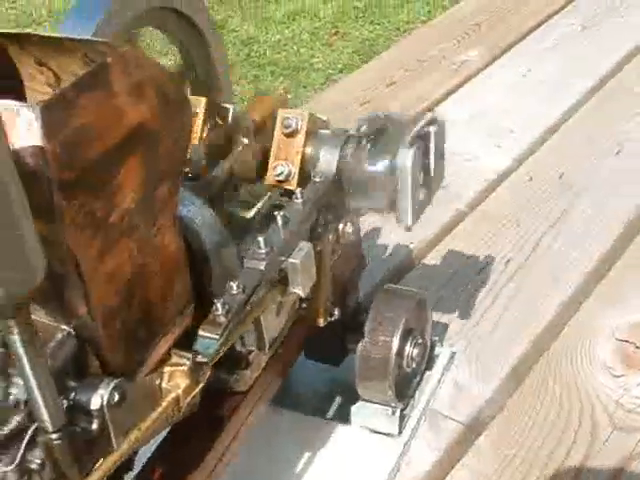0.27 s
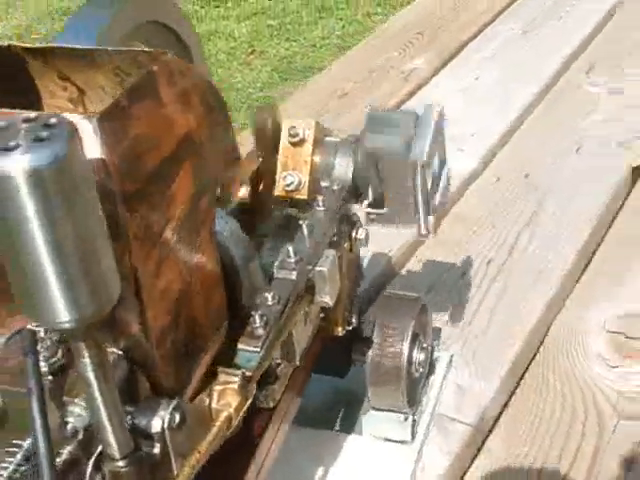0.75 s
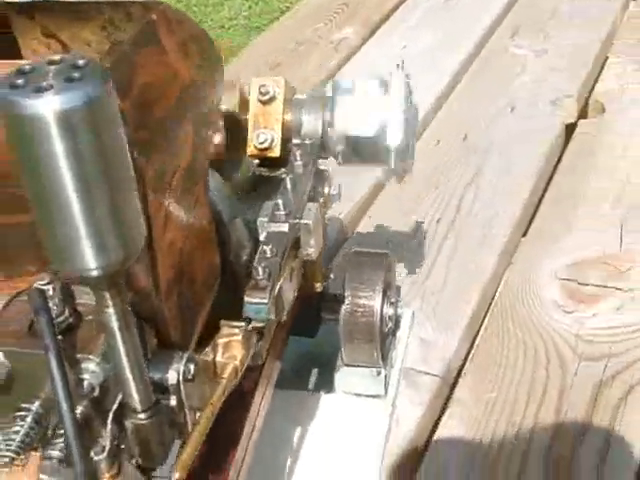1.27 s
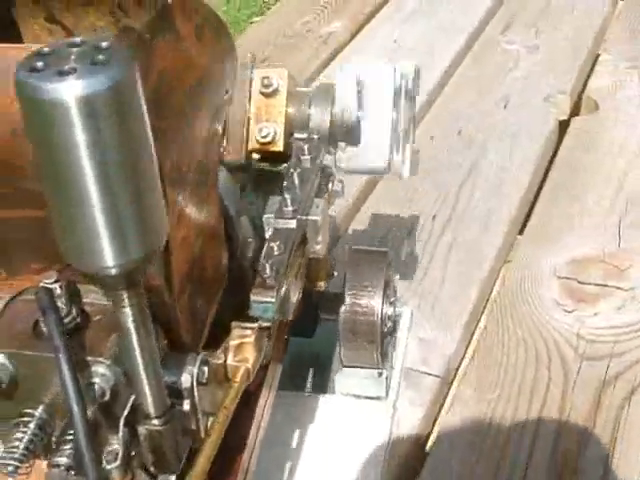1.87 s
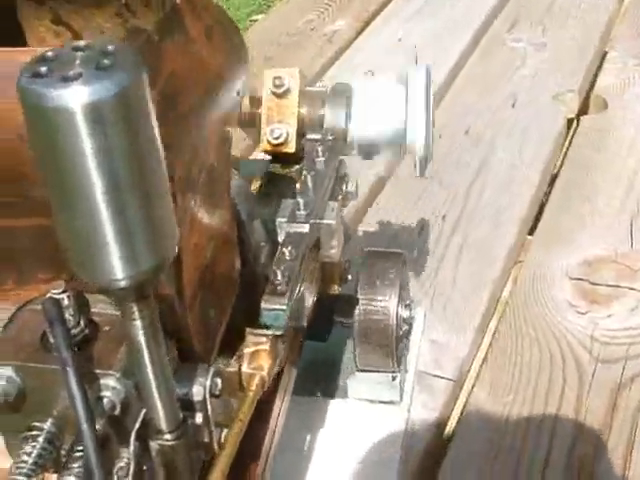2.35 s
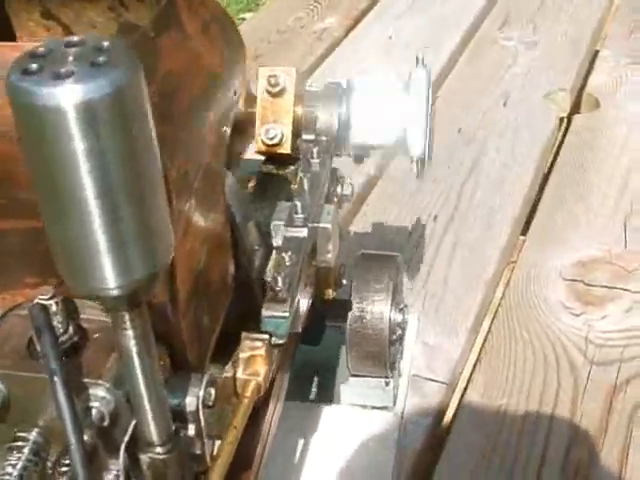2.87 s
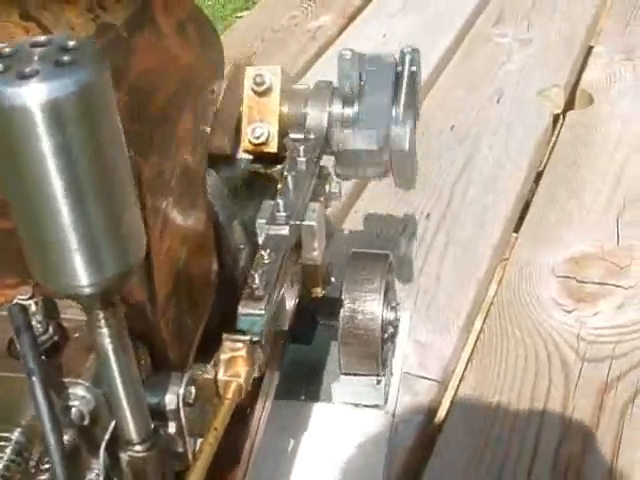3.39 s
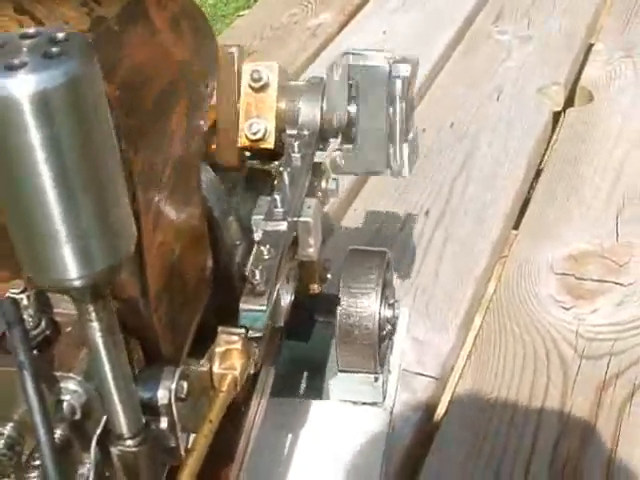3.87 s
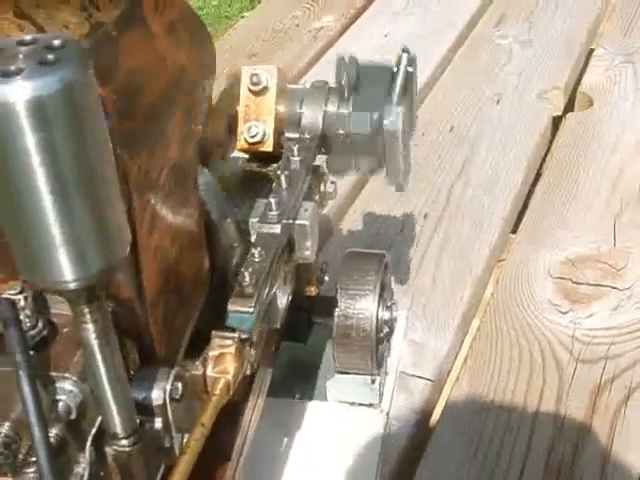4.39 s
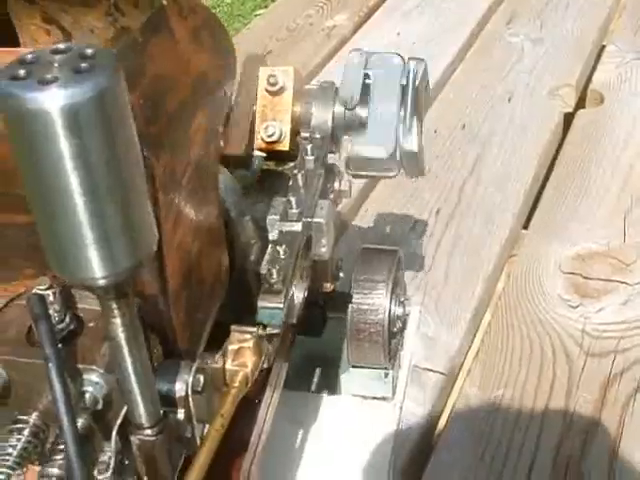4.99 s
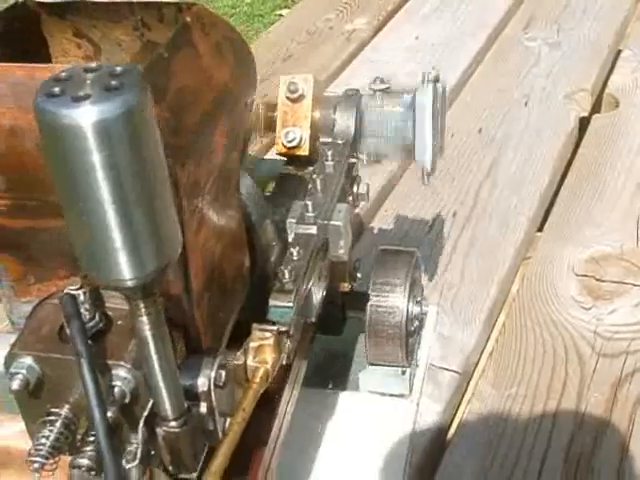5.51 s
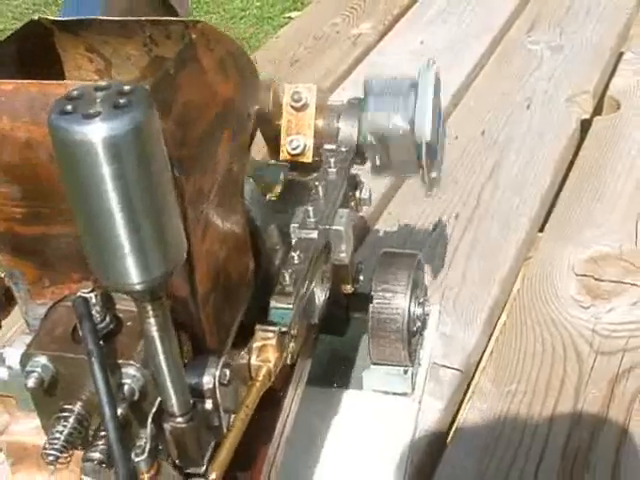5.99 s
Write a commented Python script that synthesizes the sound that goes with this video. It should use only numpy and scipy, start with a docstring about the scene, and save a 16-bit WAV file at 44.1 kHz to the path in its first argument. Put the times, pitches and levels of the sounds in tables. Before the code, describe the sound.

A small open-crank engine runs close to the microphone in a yard. About once a second it fires with a sharp, spitting crack from its metal silencer, seven times in all. Between firings it coasts with quick soft puffs of air, ticking and jingling rods, a faint gear whirr and brief weak hoots from the intake. There is hardly any echo, and the quiet parts have a gritty crackle.

```python
"""Outdoors in a fenced yard, a small open-crank engine coasts, puffing air through its open exhaust valve
at each piston stroke while the gears whirr, the linkage ticks and the intake valve hoots. About once a
second the pushrod drops off the governor latch, the engine fires and the pepper-pot silencer cracks.
It all passes through an 8-bit, 16 kHz converter, so the quiet parts break up into single-step crackle."""
import sys
import numpy as np
from scipy import signal
from scipy.fft import rfft, irfft, next_fast_len
from scipy.io import wavfile
from scipy.ndimage import map_coordinates

SR = 44100
rng = np.random.default_rng(int(sys.argv[2]) if len(sys.argv) > 2 else 0)


def int16_out(signal):
    """Quantize to a 16-bit WAV file."""
    q = np.round(np.clip(np.atleast_2d(signal).T, -1, 1) * 32767)
    wavfile.write(sys.argv[1], SR, q.astype(np.int16))


N = 275625

# firings: t/s, pressure push/dB, spit/dB, blow-down length/s, lead of the latch drop/s, latch drop/dB
FIRINGS = [(0.632, -24, -6, 0.0084, 0.022, -28.5), (1.6273, -22, -6, 0.01, 0.029, -28.5),
           (2.3747, -18, -4.5, 0.0076, 0.029, -33), (3.3334, -21.5, -4.5, 0.009, .028, -29.5),
           (4.3275, -23, -4.5, 0.0091, 0.028, -27.5), (5.3306, -21.5, -4, 0.0069, .0315, -29),
           (6.0825, -21.5, -4.5, 0.0082, 0.026, -31.5)]
# puffs of pumped air, about one per piston stroke: t/s, level/dB, pipe note/Hz
STROKES = [(0.0268, -33, 850), (0.109, -32.5, 1150), (0.1984, -32, 1150), (0.2903, -37.5, 433),
           (0.3406, -41, 1470), (0.4286, -32, 875), (0.5385, -47, 595), (0.7202, -36, 426),
           (0.812, -31.5, 910), (0.8992, -33, 363), (0.989, -31.5, 1260), (1.0803, -33, 371),
           (1.1787, -33.5, 840), (1.2534, -42, 1440), (1.3254, -45.5, 1190), (1.4055, -33, 1010),
           (1.438, -42.5, 450), (1.5367, -43, 1190), (1.713, -33.5, 923), (1.8094, -30, 964),
           (1.892, -28.5, 358), (1.925, -39, 740), (1.9731, -31, 1286), (2.0742, -35, 1190),
           (2.1603, -32.5, 1310), (2.1894, -29.5, 930), (2.3229, -36.5, 1390), (2.4645, -34.5, 627),
           (2.5561, -34, 970), (2.6363, -34.5, 896), (2.7206, -35, 930), (2.812, -33.5, 500),
           (2.9068, -35.5, 1000), (2.9444, -39.5, 1200), (2.98, -36, 440), (3.0882, -42, 1370),
           (3.1212, -33.5, 910), (3.155, -37, 466), (3.2457, -43, 1370), (3.4277, -35, 960),
           (3.511, -32.5, 1075), (3.5999, -31.5, 550), (3.691, -33.5, 910), (3.78, -32.5, 935),
           (3.8676, -31, 1070), (3.9124, -31, 1250), (4.023, -47.5, 1480), (4.102, -32, 893),
           (4.2228, -39.5, 790), (4.4107, -37, 1150), (4.5043, -34, 1230), (4.5936, -33.5, 1030),
           (4.6316, -43, 720), (4.684, -32.5, 1020), (4.7742, -37, 1050), (4.8752, -34, 1200),
           (4.9116, -35, 440), (5.023, -40, 1480), (5.1111, -32, 920), (5.223, -42.5, 1204),
           (5.4303, -35.5, 1040), (5.5061, -32, 1020), (5.5947, -31.5, 353), (5.6948, -31.5, 830),
           (5.781, -30.5, 960), (5.8792, -32, 1110), (5.915, -33.5, 486), (5.9772, -45, 1060),
           (6.028, -39, 1500), (6.169, -36.5, 1184)]
# exhaust pipe resonances: f/Hz, width/Hz, level/dB
PIPE_MODES = [(394, 90, -2.5), (745.3, 130, -5), (995, 90, -2), (1206, 45, 2.5), (1409, 90, -4),
              (1693, 120, -6.5)]
# ringing rods and rockers: f/Hz, level/dB, t60/s
LINKAGE_MODES = [(1478, -4, .05), (2127, -1.5, .05), (2365, -2, .05), (3095, -2.5, 0.074),
                 (3658, -0.5, 0.05), (4790, -7.5, .02), (6640, 0, .03), (7000, -3.5, .02)]
# colour of the stroke hiss and the whirr: f/Hz, level/dB
AIR_SPECTRUM = [(35, -50), (60, -6.5), (251, -4.5), (444, -5), (755, -7), (1210, -6.5), (2730, -12),
                (3640, -11), (6850, -13), (7900, -12), (10300, -54), (17400, -120)]


def amp(db):
    """Gain of a level in dB."""
    return 10 ** (np.asarray(db) / 20)


def unit(x):
    """x at rms 1."""
    return x / np.sqrt(np.mean(x ** 2) + 1e-20)


def along(points, hz):
    """Read a curve of (f/Hz, value) points on a log frequency axis."""
    f, values = np.transpose(points)
    return np.interp(np.log(hz + 1), np.log(f + 1), values)


def filtered(x, response):
    """x through a complex frequency response."""
    size = next_fast_len(len(x) + 8192)
    return irfft(rfft(x, size) * response(np.fft.rfftfreq(size, 1 / SR)), size)[:len(x)]


def noise(response, size=N):
    """Coloured noise of rms 1."""
    return unit(filtered(rng.standard_normal(size), response))


def modes(table):
    """Response of (f/Hz, width/Hz, level/dB) resonances, summed with alternating polarity."""
    return lambda f: sum((-1) ** k * amp(db) * 1j * f * width / (hz * hz - f * f + 1j * f * width)
                         for k, (hz, width, db) in enumerate(table))


def favoured(table, note_hz, db_per_octave):
    """Resonances turned down by their distance from note_hz."""
    return [(hz, width, db - db_per_octave * abs(np.log2(hz / note_hz))) for hz, width, db in table]


def add(track, start, x):
    """Mix x into track from start, in seconds."""
    part = track[max(round(start * SR), 0):][:len(x)]
    part += x[:len(part)]


def whirr():
    """Gears, bearings and open air: a bed of noise that drifts in level."""
    # fader moves: t/s, level/dB
    bed_levels = [(0.0, -51.5), (0.48, -53.5), (1.06, -50.5), (1.43, -56.5), (1.79, -50), (2.091, -46.5),
                  (2.42, -52.5), (2.99, -50), (3.171, -55.5), (3.79, -52.5), (4.1, -55), (4.86, -50.5),
                  (5.17, -54), (5.69, -52.5), (6.0, -54), (6.25, -54)]
    times, db = np.transpose(bed_levels)
    return amp(np.interp(np.arange(N) / SR, times, db)) * noise(lambda hz: amp(along(AIR_SPECTRUM, hz)))


def yard(x):
    """A short answer from the boards, each frequency dying at its own speed."""
    # decay off boards and fence: f/Hz, t60/s
    decay_times = [(200, 0.22), (1200, .25), (4000, 0.11), (8000, 0.033)]
    hz, t, spectra = signal.stft(rng.standard_normal(SR // 3), SR, nperseg=256)
    tail = signal.istft(spectra * amp(-60 * t / along(decay_times, hz)[:, None]), SR, nperseg=256)[1]
    return signal.fftconvolve(np.pad(x, (300, 0)), tail / np.linalg.norm(tail))[:N]


def intake(hoot_hz=441.5):
    """The intake valve hoots as it is sucked open, swelling fast and fading."""
    # hoots: t/s, level/dB, length/s
    hoots = [(0.269, -46, 0.023), (1.217, -41, 0.017), (1.432, -51, 0.066), (2.194, -50.5, 0.042),
             (2.984, -44, 0.029), (3.925, -45.5, 0.025), (4.137, -48, 0.025), (4.92, -46, 0.04),
             (5.141, -47.5, 0.017), (5.928, -41.5, 0.021)]
    out, t = np.zeros(N), np.arange(SR // 6) / SR
    for start, db, length in hoots:
        age = 3 * t / length
        add(out, start, amp(db + 9.5) * age * np.exp(-age) * np.sin(2 * np.pi * hoot_hz * t))
    return out


def snap(db, t60=.012):
    """The thin bright click of a small hard part."""
    return amp(db - 60 * np.arange(400) / SR / t60) * noise(modes([(6670, 2300, 0)]), 400)


def tick(db, struck_hz):
    """A knock rings mostly the part struck, the others weakly, over a short crack."""
    t = np.arange(SR // 10) / SR
    ring = np.zeros(len(t))
    for hz, level, t60 in LINKAGE_MODES:
        mode_db = level - 24 * abs(np.log2(hz / struck_hz)) + rng.normal(0, 1.9)
        ring += amp(mode_db - 60 * t / t60) * np.sin(2 * np.pi * hz * t)
    crack = amp(4 - 60 * t / .0091) * rng.standard_normal(len(t))
    return amp(db - 7.5) * (ring + crack)


def linkage(backlash_s=.05):
    """Rods and rockers tick and snap; each puff also shakes a faint one out of a loose joint."""
    # foreground ticks: t/s, level/dB, pitch of the part struck/Hz
    ticks = [(0.1424, -38, 2150), (0.2314, -26.5, 2190), (0.4294, -32.5, 2100), (0.8994, -46, 1970),
             (1.3239, -31, 1480), (1.7344, -39.5, 3770), (1.8394, -31, 2180), (1.9026, -26, 6000),
             (2.0944, -36, 3640), (2.1101, -30, 2120), (2.1605, -34.5, 2340), (2.2044, -27.5, 2320),
             (2.3226, -29, 1470), (2.5557, -34.5, 3730), (2.7307, -36, 3760), (2.9151, -34.5, 3030),
             (3.1396, -33.5, 2150), (3.5174, -39, 3670), (3.9704, -36, 4010), (4.0238, -29.5, 1460),
             (4.5092, -39, 3800), (4.8194, -37.5, 2010), (4.9117, -40, 2330), (5.022, -33, 1480),
             (5.5967, -29, 6400), (5.6351, -33.5, 2030), (5.6945, -29.5, 1540), (5.7833, -41, 1540),
             (6.0282, -34.5, 1480)]
    # foreground snaps: t/s, level/dB
    snaps = [(1.1636, -36), (1.8344, -39.5), (1.988, -30.5), (2.0113, -34), (2.1604, -31), (2.2094, -38),
             (2.7456, -37), (3.5325, -37.5), (3.7158, -37), (3.8677, -35), (3.9384, -32.5), (4.5294, -36),
             (4.7115, -34.5), (4.8755, -36.5), (5.5163, -43.5), (5.903, -35.5)]
    out = np.zeros(N)
    for start, db, struck_hz in ticks:
        add(out, start, tick(db, struck_hz))
    for start, db in snaps:
        add(out, start, snap(db))
    for (start, db, _), (lag, pick) in zip(STROKES, rng.random((len(STROKES), 2))):
        hz = LINKAGE_MODES[int(pick * len(LINKAGE_MODES))][0]
        loose_db = db - 8.5
        add(out, start + backlash_s * lag, tick(loose_db, hz) if hz < 4000 else snap(loose_db))
    return out


def puff(db, note_hz, rod_hz, t60, rise_s, slack, whistle_trim_db=0):
    """Slack is taken up with a clack, then valve hiss, a pipe note, a thin whistle and jingling rods."""
    t = np.arange(SR // 8) / SR
    envelope = (1 - np.exp(-t / rise_s)) * amp(-60 * t / t60) * np.clip((.11 - t) / .044, 0, 1)
    clack = 1 + slack * np.exp(-t / .003)
    knocks = clack * rng.standard_normal(len(t)) * (rng.random(len(t)) < .008)
    rods = [(hz, 4 / decay, level) for hz, level, decay in LINKAGE_MODES]
    jingle = unit(filtered(knocks, modes(favoured(rods, rod_hz, db_per_octave=6))))
    hiss = noise(lambda hz: amp(along(AIR_SPECTRUM, hz)), len(t))
    airflow = clack * rng.standard_normal(len(t))
    pipe = unit(filtered(airflow, modes(favoured(PIPE_MODES, note_hz, db_per_octave=6.5))))
    whistle = amp(whistle_trim_db) * noise(modes([(6814, 760, 0)]), len(t))
    return amp(db) * envelope * (amp(-14) * (hiss + jingle) + amp(-13.5) * pipe + amp(-22) * whistle)


def coasting(held_open_s=.5, exhaust_rod_hz=3460, rocker_hz=2407):
    """Piston puffs: the exhaust rod jingles while its valve is held open after a firing, then rockers."""
    out = np.zeros(N)
    fired = np.array([-held_open_s / 2] + [row[0] for row in FIRINGS])  # the valve starts held open
    for (start, db, note_hz), (detune, trim) in zip(STROKES, rng.standard_normal((len(STROKES), 2))):
        held_open = start - fired[fired < start][-1] < held_open_s
        rod_hz = (exhaust_rod_hz if held_open else rocker_hz) * np.exp(.12 * detune)
        add(out, start, puff(db, note_hz, rod_hz, t60=.24, rise_s=.0039, slack=.72,
                             whistle_trim_db=2 * trim))
    return out


def latch(rod_hz=3040):
    """Just ahead of each firing the pushrod drops off the governor latch with a tick and a rattle."""
    out = np.zeros(N)
    for start, *_, lead, db in FIRINGS:
        rattle = puff(db - 4.5, note_hz=1424, rod_hz=rod_hz, t60=.17, rise_s=.0004, slack=2)
        add(out, start - lead, rattle)
        add(out, start - lead, tick(db, rod_hz))
    return out


def pipe_ring(t, hz=1218, peak_s=.041, spread_s=.032):
    """The exhaust pipe rings on after the blow-down: a breathy note that blooms and fades."""
    tone = np.sin(2 * np.pi * (hz * t + rng.random()))
    breath = noise(modes(favoured(PIPE_MODES, hz, db_per_octave=11)), len(t))
    return (tone + .3 * breath) * np.exp(-((t - peak_s) / spread_s) ** 2)


def shell_ring(t, hz=4740, peak_s=.0075, t60=.016):
    """The silencer shell gives a brief, gritty ping."""
    tone = np.sin(2 * np.pi * (hz * t + rng.random()))
    grit = noise(modes([(4490, 490, 0)]), len(t))
    envelope = np.clip(t / peak_s, 0, 1) ** 3 * amp(-60 * np.maximum(t - peak_s, 0) / t60)
    return (tone + .66 * grit) * envelope


def gas_spit(t, blow_down_s, onset_s=.0008, peak_s=.0036, fall_db_per_s=1993):
    """Hot gas spits through the silencer holes until the valve flow chokes off; a weak hiss remains."""
    # colour of the jets: f/Hz, level/dB
    jet_spectrum = [(180, -29), (300, -17.5), (1430, -5), (1980, -3.5), (2790, -8.5), (3670, -1),
                    (4210, -3), (4760, -2.5), (5310, -7.5), (5850, 1), (6800, -3.5), (7480, 5.5),
                    (7900, -5), (10300, -33.5), (17400, -120)]
    attack = np.clip((t - onset_s) / (peak_s - onset_s), 0, 1) ** 1.5
    fall = amp(-fall_db_per_s * np.maximum(t - peak_s, 0))
    choke = 1 / (1 + np.exp((t - blow_down_s) / .0014))
    tail = amp(-27.5 - 60 * t / .06) * (t > onset_s)
    sputter = amp(4 * rng.standard_normal(len(t))) * rng.standard_normal(len(t))
    jets = unit(filtered(sputter, lambda hz: amp(along(jet_spectrum, hz))))
    return (attack * fall * choke + tail) * jets


def firing():
    """The bang: a pressure push leaves the pipe, the silencer spits, and shell and pipe ring."""
    # valve gear clicks around each firing: lag/s, level/dB
    valve_clicks = [(-.0145, -37.5), (0.035, -39)]
    out, t = np.zeros(N), np.arange(SR // 8) / SR
    pulse_time = (t - .0008) / .00029
    push = -pulse_time * np.exp(.5 - pulse_time ** 2 / 2)  # one compression, one rarefaction
    for start, push_db, spit_db, blow_down_s, *_ in FIRINGS:
        spit = amp(spit_db - 6.5) * gas_spit(t, blow_down_s)
        pipe = amp(-48.5) * pipe_ring(t)
        shell = amp(spit_db - 17) * shell_ring(t)
        add(out, start, amp(push_db) * push + spit + pipe + shell)
        for lag, click_db in valve_clicks:
            add(out, start + lag, snap(click_db))
    return out


def scene():
    """The engine close up, in mono; only the firings feed the yard's faint reverb."""
    bangs = firing()
    return (bangs + amp(-24.5) * yard(bangs) + whirr() + coasting() + latch() + linkage() + intake())[None]


def record(dry, rate_hz=16000, step=1 / 128, first_shift_s=1.14, shift_every_s=1.003):
    """An 8-bit converter whose zero swings between two values; holding each sample mirrors the treble."""
    t = np.arange(N) / SR
    analog = filtered(dry[0], lambda hz: 1j * hz / (1j * hz + 250) / (1 + (hz / 8600) ** 16))  # band-pass
    shifts = np.maximum((t - first_shift_s) // shift_every_s + 1, 0)
    zero = step * np.where(shifts % 2, .066, .17)
    held = map_coordinates(analog + zero, [np.floor(t * rate_hz) / rate_hz * SR], order=3)
    crushed = step * np.round(held / step)
    hiss = amp(-71.5) * rng.standard_normal(N)
    rumble = amp(-69.5) * noise(lambda hz: 1 / (1 + (hz / 90) ** 2))
    return filtered(crushed + hiss + rumble, lambda hz: (hz < 15500) / np.sqrt(1 + (hz / 16000) ** 6))[None]


dry = scene()
out = record(dry)
int16_out(out)
```